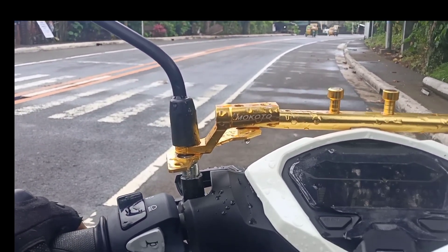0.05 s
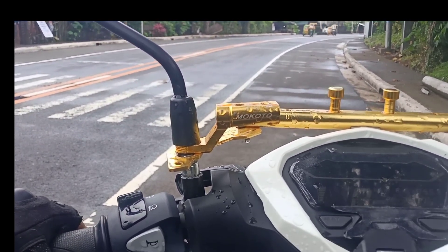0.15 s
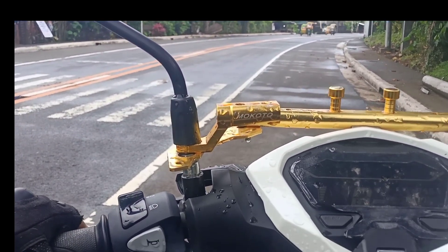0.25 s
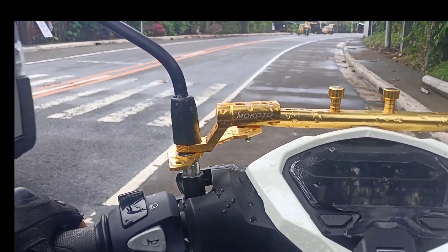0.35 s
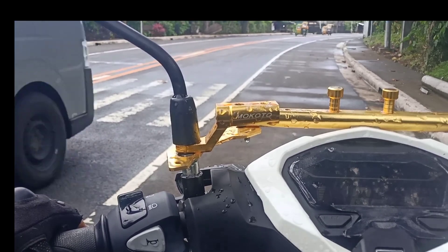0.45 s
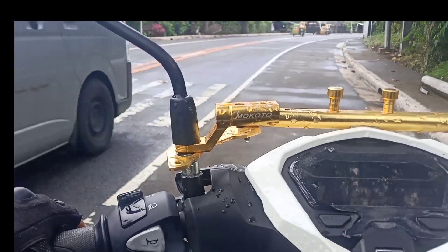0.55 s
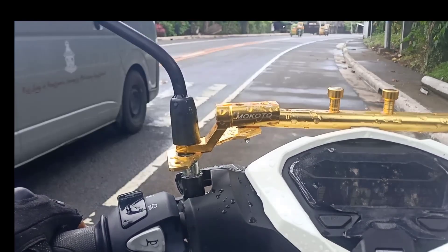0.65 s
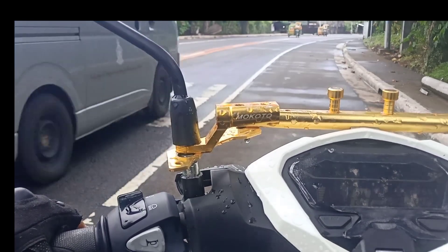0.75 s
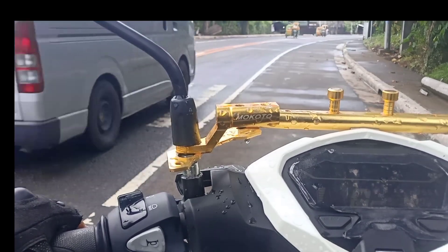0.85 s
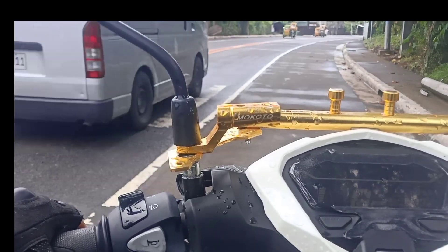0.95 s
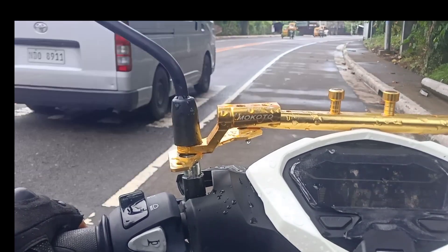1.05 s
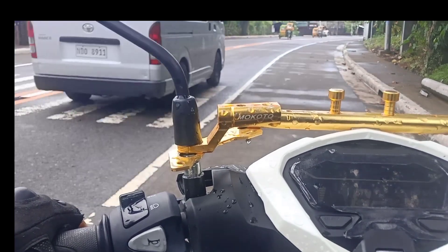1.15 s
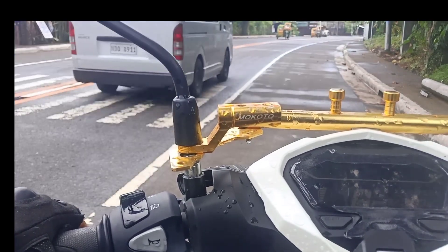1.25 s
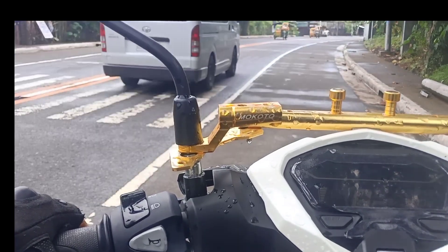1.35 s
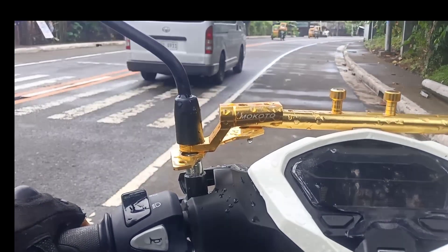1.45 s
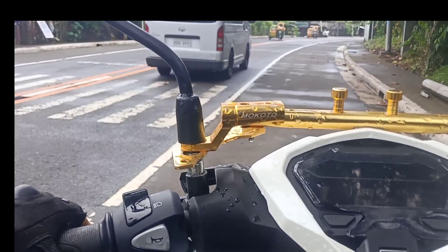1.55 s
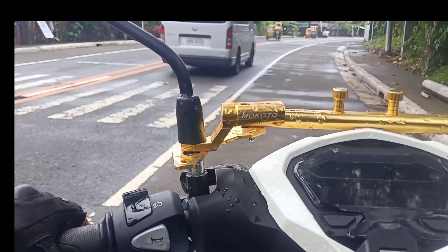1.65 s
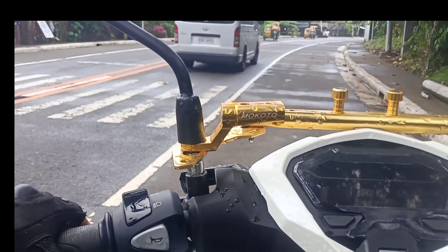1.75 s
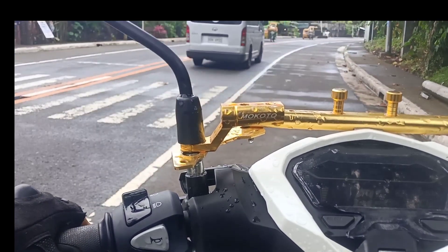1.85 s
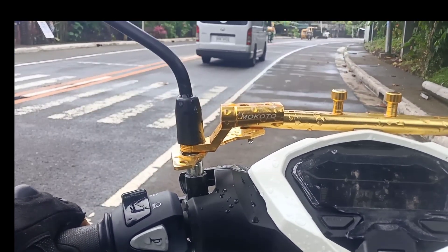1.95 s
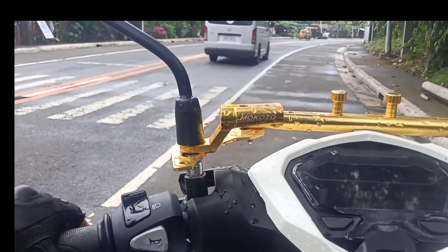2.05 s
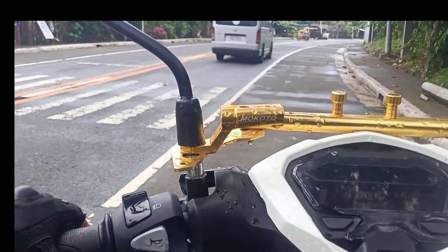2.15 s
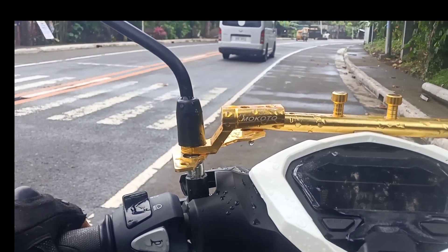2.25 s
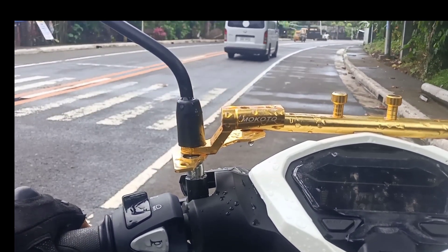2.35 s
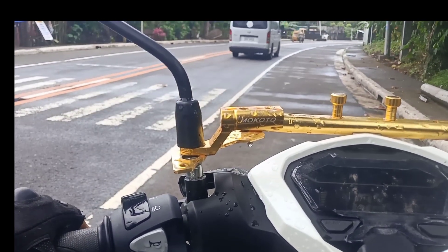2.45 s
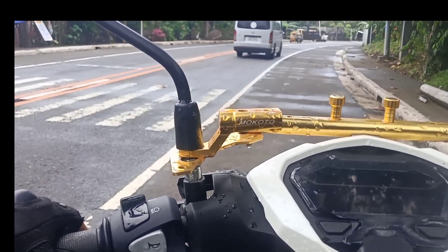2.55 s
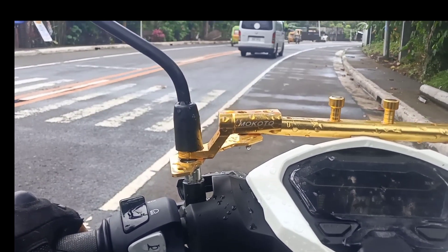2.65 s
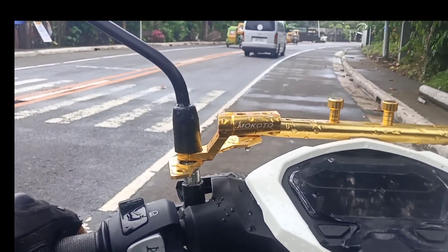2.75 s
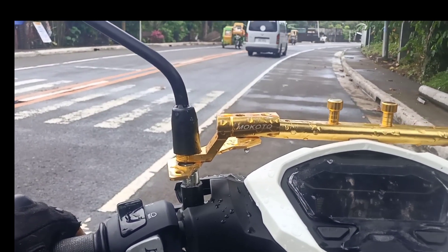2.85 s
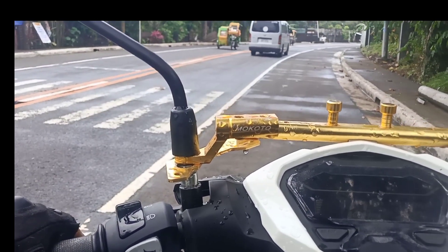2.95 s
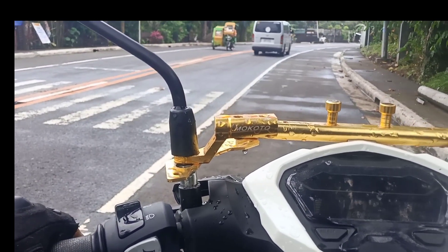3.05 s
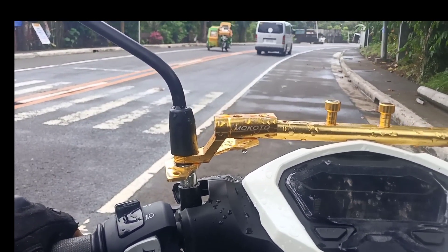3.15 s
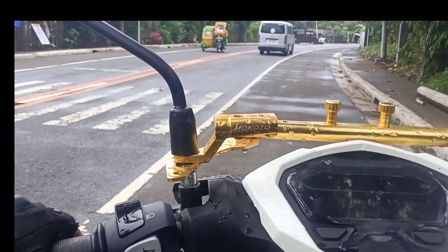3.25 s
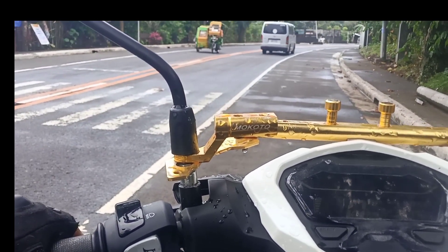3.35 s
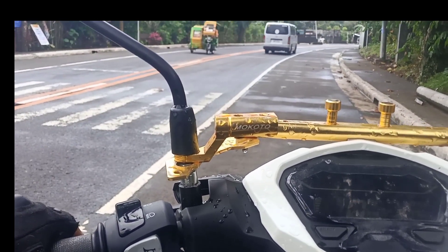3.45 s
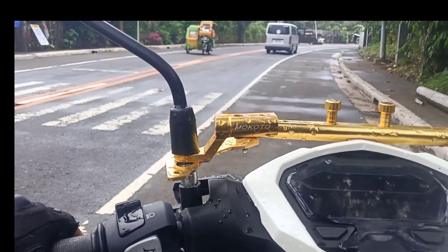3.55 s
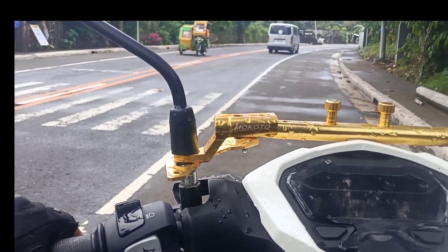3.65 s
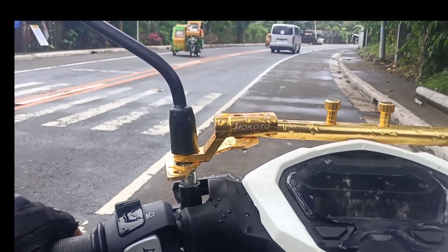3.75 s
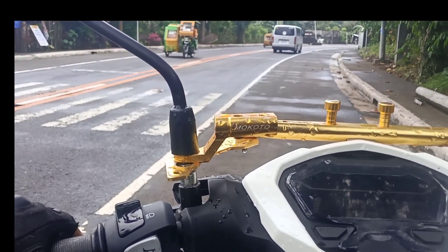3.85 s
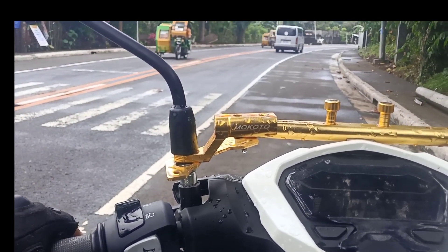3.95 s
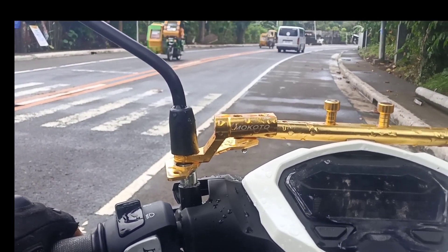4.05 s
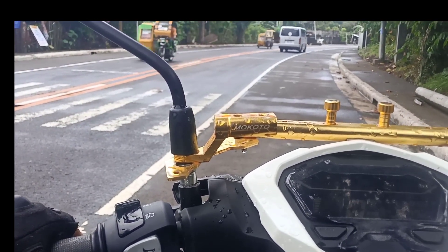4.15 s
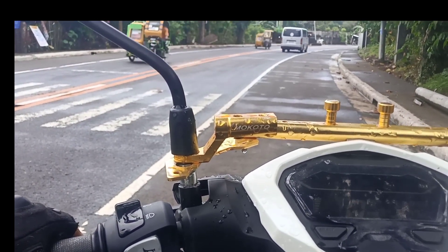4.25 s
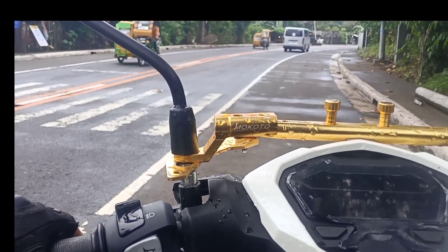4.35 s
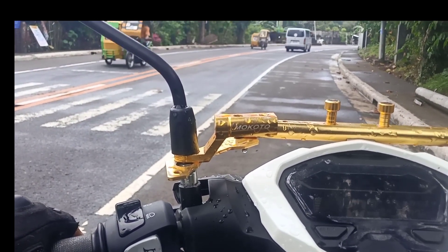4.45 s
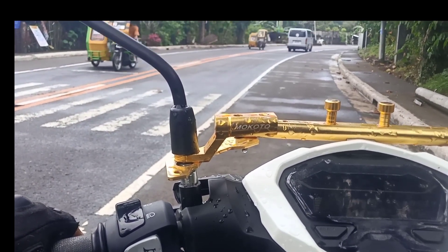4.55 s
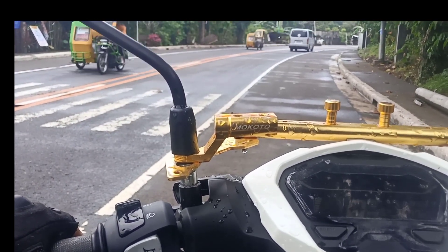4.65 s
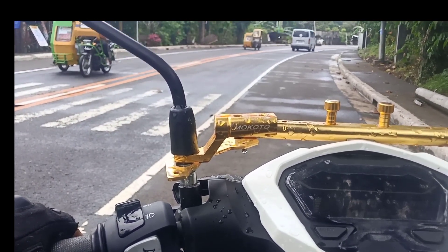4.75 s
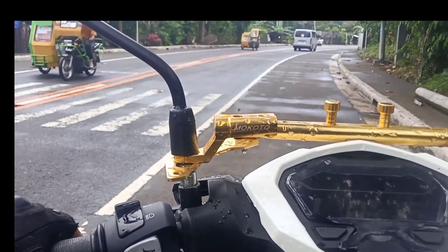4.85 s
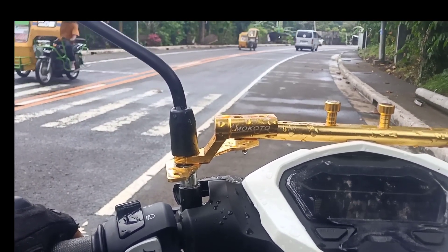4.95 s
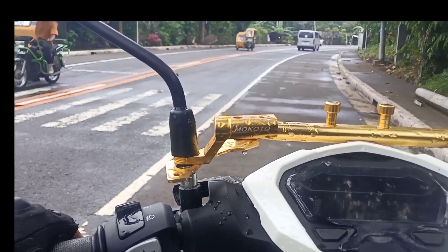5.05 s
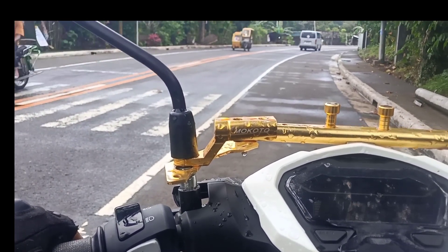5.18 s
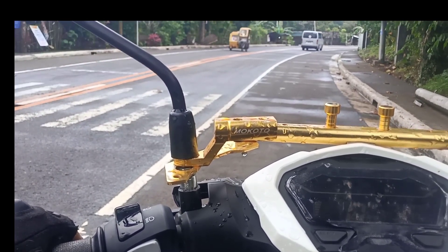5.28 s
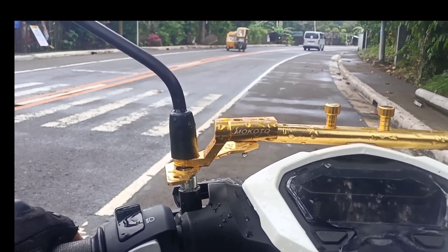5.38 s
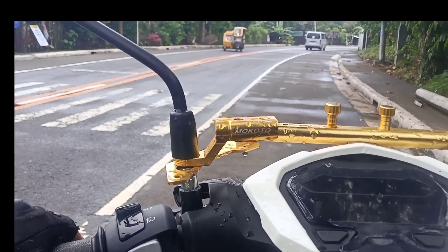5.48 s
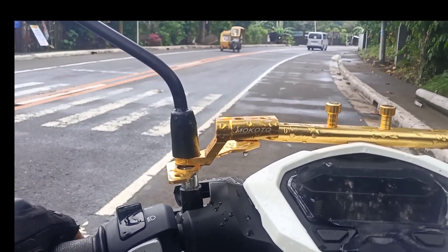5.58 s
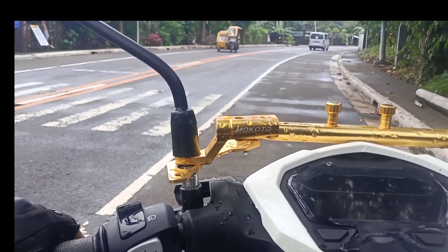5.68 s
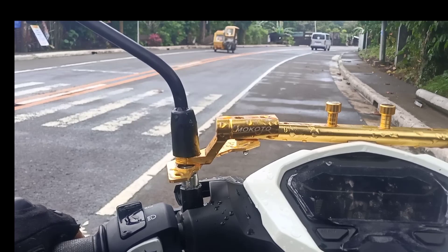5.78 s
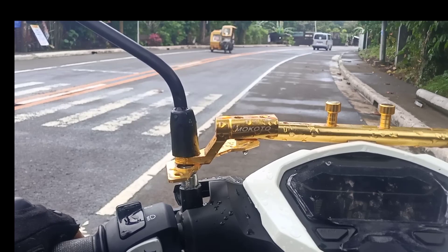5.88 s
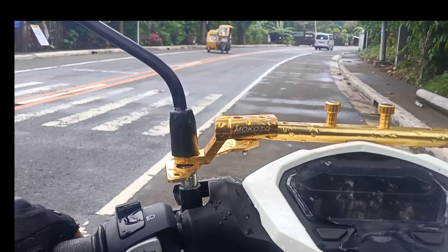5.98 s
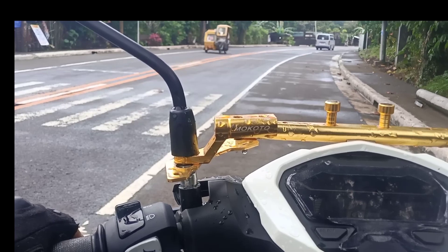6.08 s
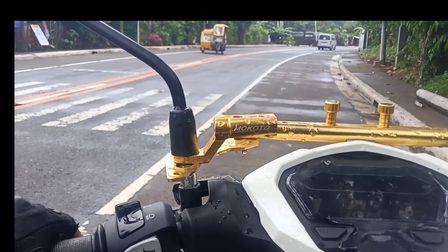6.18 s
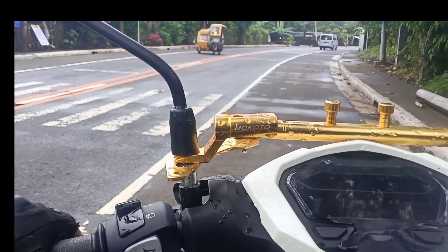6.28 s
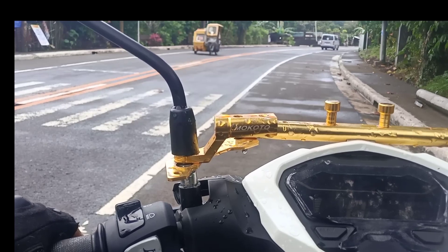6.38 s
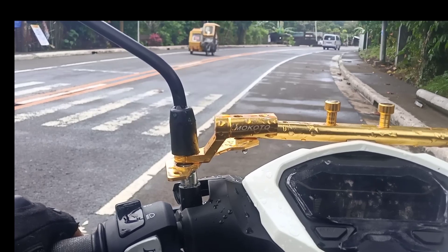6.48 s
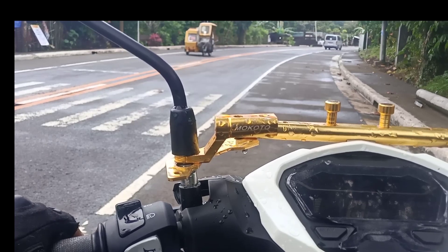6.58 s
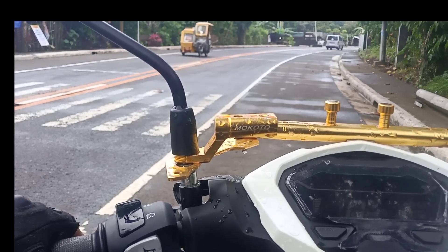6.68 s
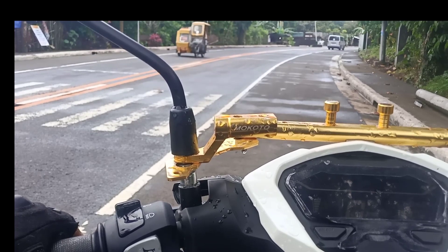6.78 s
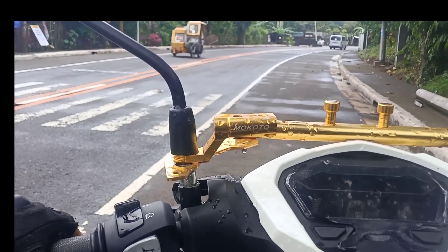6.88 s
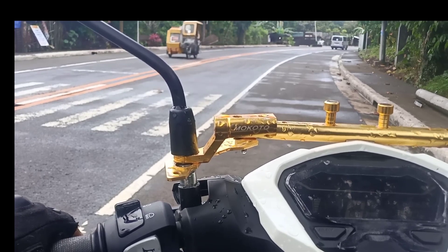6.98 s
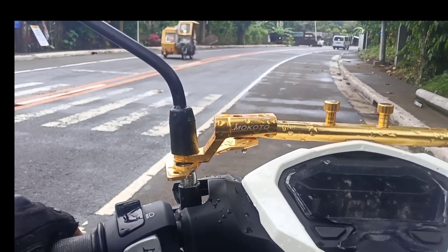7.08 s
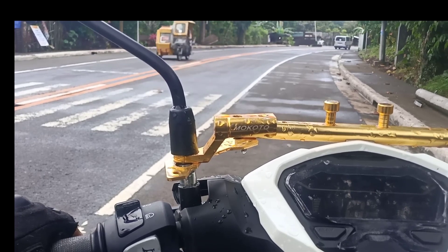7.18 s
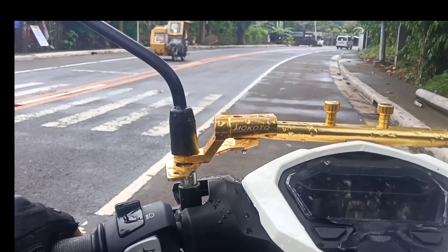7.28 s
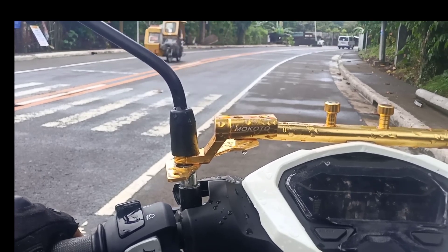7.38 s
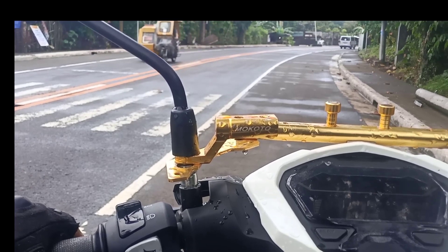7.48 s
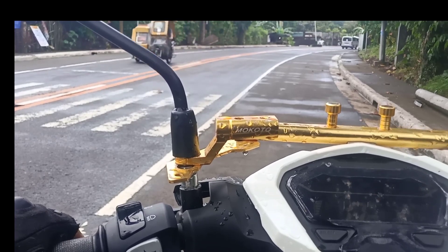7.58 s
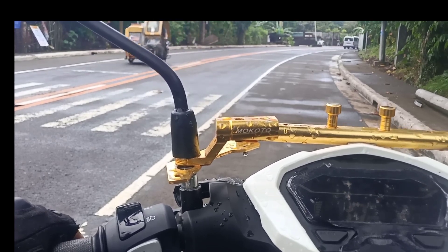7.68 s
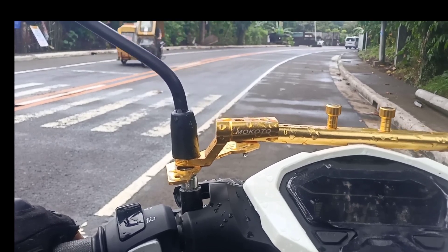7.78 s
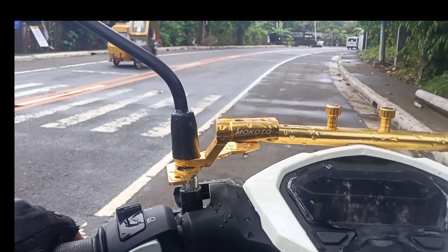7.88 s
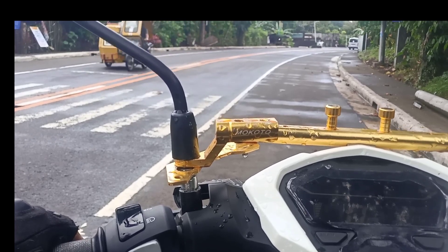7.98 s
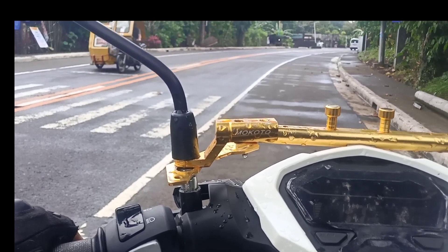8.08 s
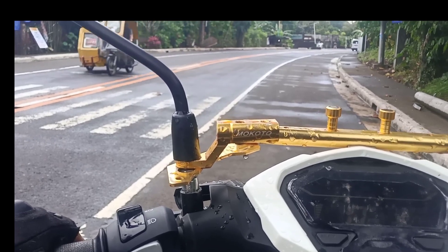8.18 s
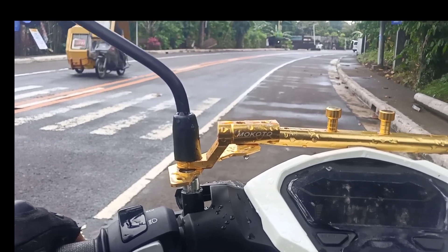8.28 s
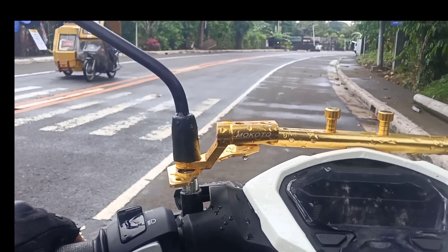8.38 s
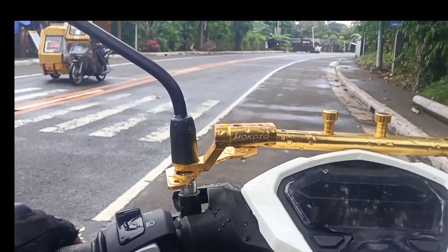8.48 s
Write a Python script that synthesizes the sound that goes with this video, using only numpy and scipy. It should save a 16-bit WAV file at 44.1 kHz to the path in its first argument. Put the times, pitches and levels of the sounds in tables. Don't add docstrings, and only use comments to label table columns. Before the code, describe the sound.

At a roadside, a microphone on a parked motorcycle catches its soft low idle. A diesel van rushes by close almost at once, tyres roaring, engine climbing in pitch before easing off. Another engine drones behind and briefly revs. A single-cylinder tricycle then putters past with whine and panel knocks, followed by a second with blipped throttle, rattling tinware and a closing pop. Muffled tyre noise stays underneath.

```python
import sys
import numpy as np
from scipy import signal
from scipy.fft import rfft, irfft, next_fast_len
from scipy.io import wavfile
from scipy.ndimage import uniform_filter1d, map_coordinates

SR = 44100
rng = np.random.default_rng(int(sys.argv[2]) if len(sys.argv) > 2 else 0)


def store_pcm(level_fs):
    pcm = np.round(np.clip(level_fs, -1, 1) * 32767).astype(np.int16)
    wavfile.write(sys.argv[1], SR, np.atleast_2d(pcm).T)


def attenuation_scalar(level_db):
    decades = np.asarray(level_db, float) / 20
    return 10 ** decades


N = 376173


def unit(x):
    return x / np.sqrt(np.mean(x ** 2) + 1e-20)


def along(points, hz):
    f, v = np.transpose(points)
    return np.interp(np.log(hz + 1), np.log(f + 1), v)


def curves(rows):
    s, *cols = np.transpose(rows)
    return [np.interp(np.arange(N) / SR, s, c) for c in cols]


def wobble(rate_hz):
    coarse = np.arange(0, N + 256, 256)
    knots = rng.standard_normal(200)
    return np.interp(np.arange(N), coarse, map_coordinates(knots, [coarse * rate_hz / SR]))


def held(on_s, off_s, attack_s, release_s):
    t = np.arange(N) / SR
    rise = (t - on_s) / abs(attack_s)
    fall = 1 + (off_s - t) / abs(release_s)
    return np.clip(np.minimum(rise, fall), 0, 1)


def passing(closest_s, approach_s, retreat_s):
    t = np.arange(N) / SR - closest_s
    return -10 * np.log10(1 + (t / np.where(t < 0, approach_s, retreat_s)) ** 2)


def blips(rows):
    t = np.arange(N) / SR
    return sum(db * np.exp(-((t - s) / half_width_s) ** 2) for s, half_width_s, db in rows)


def filtered(x, response):
    m = next_fast_len(N + SR // 4)
    return irfft(rfft(x, m) * response(np.fft.rfftfreq(m, 1 / SR)), m)[..., :N]


def resonant(x, modes, order=1):
    def response(f):
        return sum(attenuation_scalar(db) * 1j * f * w / (c * c - f * f + 1j * f * w) for c, w, db in modes) ** order
    return filtered(x, response)


def direct(x, diffuse=0):
    return x * [[1], [diffuse]]


def rush(spectrum, patchy_db):
    z = signal.stft(rng.standard_normal((2, N)), nperseg=512)[2]
    field = uniform_filter1d(rng.standard_normal(z.shape[1:]), 6, 0)
    field = uniform_filter1d(field, 12, 1)
    pair = signal.istft(z * attenuation_scalar(patchy_db * unit(field)), nperseg=512)[1][:, :N]
    return unit(filtered(pair, lambda hz: attenuation_scalar(along(spectrum, hz))))


def orders(count, table, waver_db, drift_rad):
    total = 0
    for k, db in table:
        level = np.sqrt(2) * attenuation_scalar(db + waver_db * wobble(4.93))
        total = total + level * np.sin(2 * np.pi * k * count + drift_rad * wobble(3.88))
    return total


def bursts(count, scatter_db, length, rise):
    sizes = attenuation_scalar(scatter_db * rng.standard_normal(300))
    size = sizes[np.floor(count).astype(int) + 130]
    phase = count % 1
    return size * np.exp(-phase / length) * (1 - np.exp(-phase / rise))


def traffic_db(level_db, swing, bright):
    # time_s, strength_db, brightness_db
    traffic = [(0, -28, -2.5), (.07, -24.5, 0), (.3, -23, 3), (.6, -23, -4.5), (.85, -23.5, -5),
               (1.2, -28, 1.5), (1.85, -31, 2), (2.1, -32.5, -1), (2.62, -36.5, 0), (3.35, -35, 5),
               (3.56, -36, 1), (3.82, -33, 1), (3.99, -35.5, 3.5), (5.6, -32.5, -1.5), (6.3, -33, -1.5),
               (7.15, -38, 1), (7.75, -37, 0.5), (8.4, -33.5, 0)]
    usual_db = -34
    strength_db, bright_db = curves(traffic)
    return usual_db + level_db + swing * (strength_db - usual_db) + bright * bright_db


def road():
    # freq_hz, density_db_per_hz
    rumble = [(20, -25.5), (45, -18), (70, -2.5), (140, 4), (250, 4), (380, -4.5), (600, -42.5),
              (1500, -92)]
    roar = [(100, -78), (250, -35), (380, -2), (550, -1), (800, -10.5), (1100, -4.5), (1450, -15.5),
            (2000, -40.5), (4000, -91.5)]
    hiss = [(500, -81.5), (1000, -20.5), (1450, 4.5), (1900, 3.5), (2350, 1.5), (2800, -5), (3300, -12.5),
            (4200, -51.5), (7000, -88)]
    fizz = [(1500, -78.5), (2600, -0.5), (3300, -11), (3900, -8), (4700, -11.5), (5500, -14.5),
            (6200, -17.5), (7000, -27.5), (8000, -34.5), (10000, -57.5), (15500, -61)]
    # over_strength_db, swing_db_per_db, brightness_share, patchiness_db
    parts = [
        (3.5, 0.6444, -.3, 1.08),
        (0, 1, 0, 1.5),
        (-7.5, 1.22, .4, 0.8),
        (-21, 0.98, 1, 1.3),
    ]
    # freq_hz, density_db_per_hz
    close = [(300, -56), (600, -9), (780, 4), (1000, -7), (1500, -5), (2000, -22), (2600, -7.5),
             (3300, -12), (3900, -18), (4300, -31), (5000, -30), (5500, -21.5), (6100, -34), (8000, -59.5)]
    # closest_s, approach_s, retreat_s, level_db
    sweeps = [
        (.48, 0.42, 0.19, -22),
        (5.8, 0.37, 0.65, -39),
        (8.6, 0.71, .5, -46),
    ]
    swell_db = 0.11 * wobble(8.2)
    tyres = 0
    for shape, (*rule, patchy_db) in zip((rumble, roar, hiss, fizz), parts):
        tyres = tyres + attenuation_scalar(traffic_db(*rule) + swell_db) * rush(shape, patchy_db)
    steepness = 1.7
    sweep = sum(attenuation_scalar(db + steepness * passing(*way)) for *way, db in sweeps)
    return tyres + sweep * rush(close, patchy_db=1.25)


def air():
    # freq_hz, density_db_per_hz
    floor = [(4000, -41.5), (6500, -2.5), (8000, -0.5), (10000, 4), (15500, -0.5), (16500, -42.5)]
    return attenuation_scalar(traffic_db(-49.5, swing=0.55, bright=.4)) * rush(floor, patchy_db=2)


def van():
    # time_s, turns_per_s
    turns = [(0, 33), (.22, 34.3), (.41, 35.5), (.62, 36.5), (.93, 37.3), (1.6, 39.9), (1.78, 40.3),
             (2.25, 37), (2.7, 36.4)]
    # order, loudest_s, approach_s, retreat_s, level_db
    tone_rows = [
        (2, .63, 1.1, 0.14, -20.5),
        (4, .66, 3, .07, -24.5),
        (6, 0.55, 1.1, 0.31, -27),
        (5, 0.75, 0.024, 0.2, -26.5),
    ]
    # time_s, half_width_s, gain_db
    load = [
        (1.9, 0.51, 6),
    ]
    # order, level_db
    growl_orders = [(3, -8), (4.5, -6), (5.5, 0), (6.5, -2), (7, -3), (7.5, -5), (8, -5)]
    count = np.cumsum(curves(turns)[0]) / SR
    tones = 0
    for order, *way, db in tone_rows:
        level = attenuation_scalar(db + passing(*way) + blips(load))
        tones = tones + level * orders(count, [(round(order), 0)], waver_db=.7, drift_rad=.15)
    growl = attenuation_scalar(-32.5 + passing(0.33, .3, .5)) * orders(count, growl_orders, waver_db=5, drift_rad=1.0)
    return direct(held(-1, 2.28, .1, .1) * (tones + growl))


def idling():
    rate_hz, fires_s = 12.27, 3.745
    count = rate_hz * (np.arange(N) / SR - fires_s) + .08 * wobble(1.5)
    thumps = -bursts(count, scatter_db=1.5, length=0.027, rise=.01)
    return direct(attenuation_scalar(-37) * unit(resonant(thumps, [(102.3, 55, 0)], order=2)))


def drone():
    # time_s, turns_so_far
    turns = [(0, -120), (2.4, -31.1), (3.242, 0), (3.7, 16.9)]
    # order, level_db
    drone_orders = [(2, -10), (3, -5), (4, -7), (5, -12), (6, -5), (7, 2), (9, 0), (12, -11), (13, -7),
                    (16, -18)]
    count, = curves(turns)
    rev = held(2.745, 3.46, 0.18, 0.28)
    ticks = bursts(count, scatter_db=-0.5, length=0.23, rise=.05) * rng.standard_normal((2, N))
    clatter = unit(resonant(ticks, [(2180, 700, 7)], order=2))
    tones = direct(orders(count, drone_orders, waver_db=1.6, drift_rad=.45))
    return held(-1, 3.46, .1, .06) * (attenuation_scalar(-43 + 10.5 * rev) * tones + attenuation_scalar(-57.5 + 11.5 * rev) * clatter)


def tricycle(count, way, exhaust_db, clatter_db, on, throttle, pipe, casing, scatter_db):
    far_db, blip_db = passing(*way), blips(throttle)
    thump = unit(resonant(-bursts(count, scatter_db, length=.02, rise=.008), pipe))
    puff = bursts(count, scatter_db=1.5, length=.38, rise=.06) * rng.standard_normal((2, N))
    clatter = unit(resonant(puff, casing, order=2))
    exhaust = direct(attenuation_scalar(exhaust_db + far_db + blip_db) * thump, diffuse=.2)
    return held(*on) * (exhaust + attenuation_scalar(clatter_db + 3.03 * far_db + 0.34 * blip_db) * clatter)


def first_tricycle():
    # time_s, firings_so_far
    firings = [(3.6, -54), (4.6, -24.2), (5.186, -7), (5.439, 0), (5.697, 7), (5.961, 14), (6.272, 22),
               (6.597, 30), (7.1, 42)]
    # time_s, half_width_s, gain_db
    throttle = [
        (3.85, .15, 7),
        (4.8, 0.091, 1.5),
        (5.66, 0.026, 6),
    ]
    # freq_hz, width_hz, level_db
    pipe = [(137, 25.6, 1.5), (300, 170, -5)]
    casing = [(2210, 360, -0.7), (2570, 700, -0.078)]
    return tricycle(*curves(firings), way=(5.5, .8, 0.8), exhaust_db=-30.5, clatter_db=-45,
                    on=(2.5, 7.0, .15, 0.09), throttle=throttle, pipe=pipe, casing=casing, scatter_db=0.7)


def whine():
    # loudest_s, approach_s, retreat_s, level_db
    whines = [(2.999, 0.08, .8, -59), (5.361, 0.13, 0.067, -51.5), (5.85, .15, 0.16, -62.5),
              (7.5, .15, 0.1, -61), (8.2, .15, 0.45, -55)]
    # time_s, pitch_hz
    pitch = [(2.7, 4250), (4.6, 4536), (4.8, 4000), (5.2, 4200), (5.6, 3765), (6.5, 3500), (7.2, 3900),
             (8.0, 3875), (8.53, 3790)]
    hz, = curves(pitch)
    flutter = filtered(rng.standard_normal((2, N)), lambda f: 1 / (1 + (f / 200) ** 2))
    level = sum(attenuation_scalar(db + 1.5 * passing(*way)) for *way, db in whines)
    return level * unit(flutter * np.sin(2 * np.pi * np.cumsum(hz) / SR))


def knocks():
    # start_s, peak_db, panel_hz
    blows = [(5.304, -34, 2490), (5.404, -27, 2074), (5.625, -28.5, 2140), (5.669, -27, 2456),
             (6.33, -30.5, 2700), (7.234, -41.5, 3700), (7.5, -37.5, 3740), (7.5, -27.5, 1656),
             (7.535, -41, 4120), (7.893, -37.5, 2290), (8.075, -31.5, 2390), (8.15, -34.5, 2880),
             (7.54, -30, 1950), (8.0, -38.5, 3900), (8.225, -28, 2000), (8.303, -25, 1920),
             (8.481, -25, 2080)]
    hits, t = np.zeros(N + SR), np.arange(SR // 20) / SR
    crack_db, crack_hz = -13, 2500
    for s, db, hz in blows:
        rattle = 1 + .6 * uniform_filter1d(rng.standard_normal(len(t)), size=40) * np.sqrt(40)
        decay = attenuation_scalar(db + 4 - 60 * t / 0.034) * (1 - np.exp(-t / 0.001))
        ring = decay * rattle * np.sin(2 * np.pi * hz * t)
        tick = np.diff(rng.standard_normal(len(t) + 1))
        crack = attenuation_scalar(db + crack_db - 60 * t / 0.013) * (hz / crack_hz) ** 2 * tick
        hits[round(s * SR):][:len(t)] += ring + crack
    return direct(hits[:N], diffuse=.3)


def second_count():
    # time_s, firings_per_s
    firing_rate = [(6.9, 26.3), (6.968, 27.3), (7.276, 30.1), (7.372, 27.4), (7.422, 26.4), (7.608, 30.9),
                   (7.82, 26.6), (8.124, 26.8), (8.53, 28.0)]
    fires_s = 8.343
    count = np.cumsum(curves(firing_rate)[0]) / SR
    return count - count[round(fires_s * SR)]


def second_tricycle():
    # time_s, half_width_s, gain_db
    throttle = [
        (7.22, 0.14, 18),
        (7.58, 0.24, 12),
        (8.5, 0.043, 6.5),
    ]
    # freq_hz, width_hz, level_db
    pipe = [(140, 13, 10), (243.6, 18, -4), (293, 28, -12.5)]
    casing = [(2000, 420, 3), (2550, 600, -5), (3900, 600, -11)]
    return tricycle(second_count(), way=(8.5, 0.67, .5), exhaust_db=-36.5, clatter_db=-41,
                    on=(6.6, 9, .3, .1), throttle=throttle, pipe=pipe, casing=casing, scatter_db=-2.5)


def pull():
    # order, level_db
    pull_orders = [(4, -6), (5, -1), (6, 1), (7, -5), (9, -3), (11, -8)]
    tones = orders(second_count(), pull_orders, waver_db=1, drift_rad=.2)
    return direct(held(7.65, 8.38, .15, .3) * attenuation_scalar(-30.5) * tones)


def housing(pair):
    # freq_hz, gain_db
    dull = [(5500, -2), (6500, 2), (8000, -19.5), (16000, -34)]
    return filtered(pair, lambda hz: attenuation_scalar(along(dull, hz)))


def ports(pair):
    # freq_hz, left_lead_rad
    lead = [(100, -.1), (500, -.5), (860, -1), (1200, -2.4), (1550, -2.9), (1900, -1.1), (2240, .1),
            (2600, 1), (2900, 1.8), (3300, 0), (3700, -1), (7000, -3)]
    # freq_hz, likeness_0_to_1
    alike = [(60, .99), (250, .97), (500, .85), (900, .5), (1500, .7), (1900, .4), (2300, .65), (3000, .45),
             (4500, .3), (7000, .15)]
    # freq_hz, left_over_right_db
    left_db = [(60, 0), (500, .5), (1200, 2), (1700, -2), (2240, 3), (2600, 6), (3000, 5), (3700, 11),
               (5100, 11), (5700, 5), (6400, 1), (8000, -2)]

    def mixing(hz):
        angle = np.arccos(np.clip(along(alike, hz), 0, 1)) / 2
        return np.array([np.cos(angle), np.sin(angle)])

    def paths(hz):
        left = attenuation_scalar(along(left_db, hz) / 2) * np.exp(.5j * along(lead, hz))
        return np.array([left, 1 / left])

    near, spread = filtered(pair, mixing)
    return filtered(np.array([near + spread, near - spread]), paths)


def scene():
    engines = idling() + drone() + first_tricycle() + whine() + knocks() + second_tricycle() + pull()
    return ports(road() + van() + housing(engines)) + air()


def roll_off(x):
    return signal.sosfilt(signal.butter(12, 15460, fs=SR, output="sos"), x)


def record(dry):
    return roll_off(dry)


dry = scene()
out = record(dry)
store_pcm(out)
```